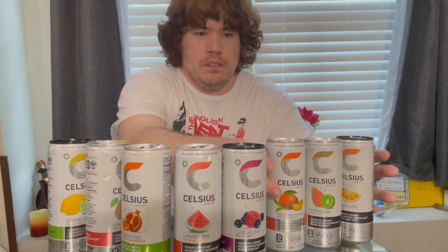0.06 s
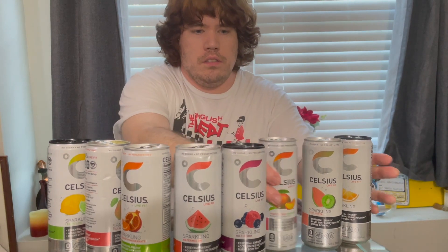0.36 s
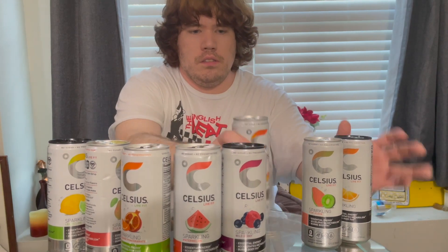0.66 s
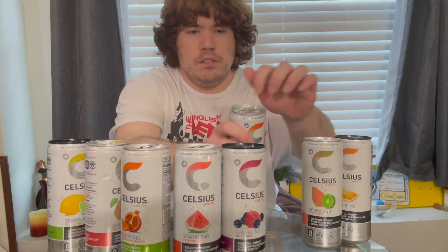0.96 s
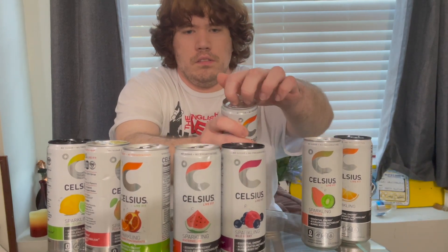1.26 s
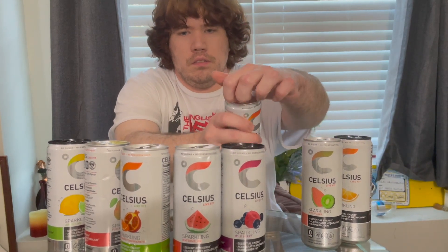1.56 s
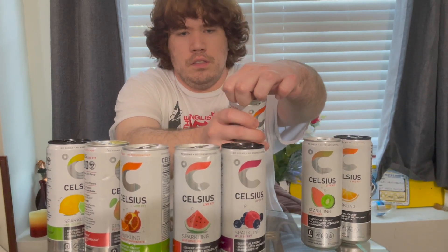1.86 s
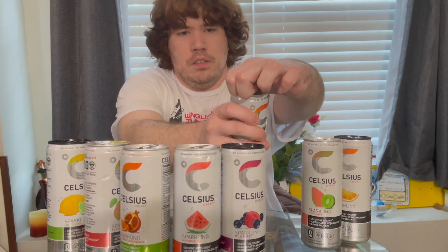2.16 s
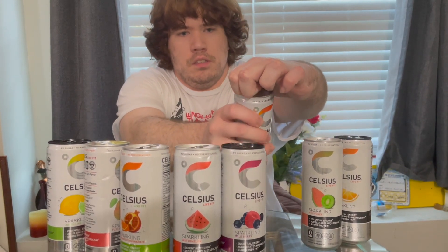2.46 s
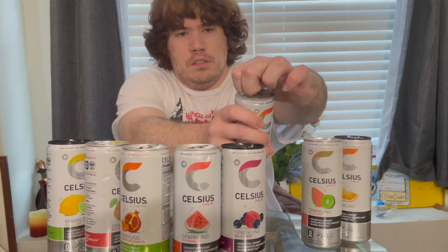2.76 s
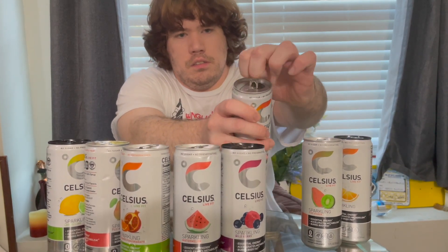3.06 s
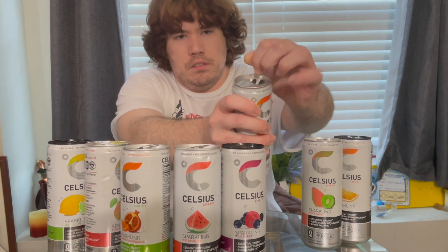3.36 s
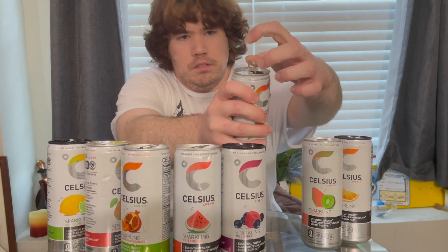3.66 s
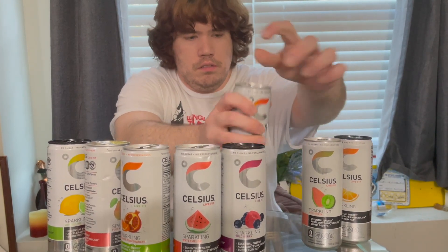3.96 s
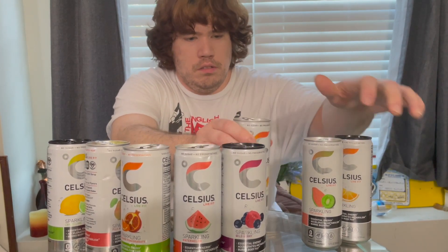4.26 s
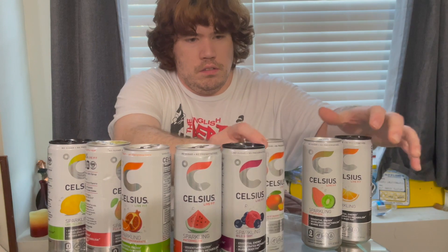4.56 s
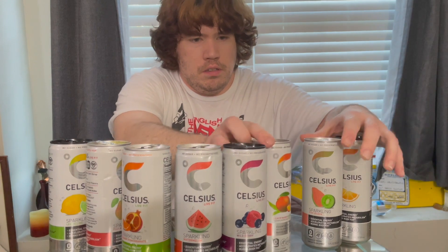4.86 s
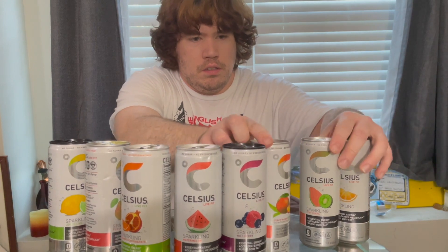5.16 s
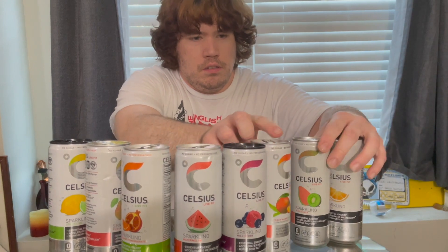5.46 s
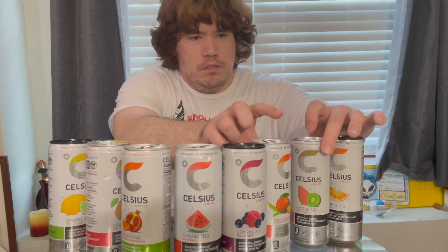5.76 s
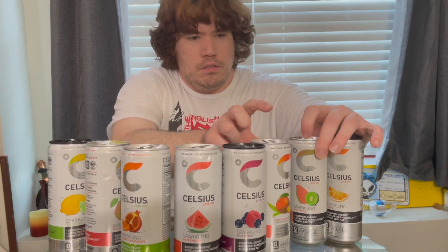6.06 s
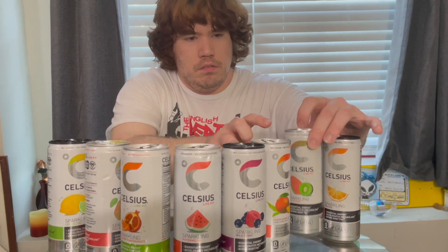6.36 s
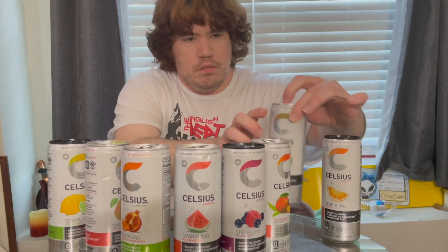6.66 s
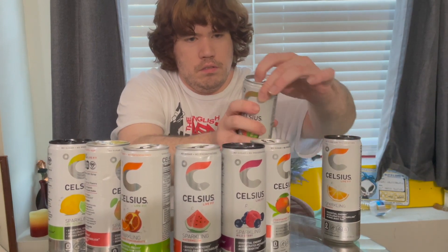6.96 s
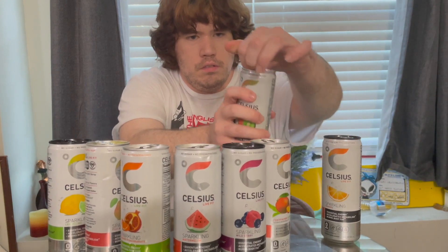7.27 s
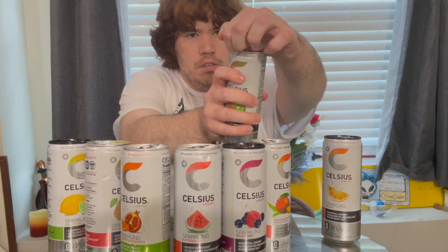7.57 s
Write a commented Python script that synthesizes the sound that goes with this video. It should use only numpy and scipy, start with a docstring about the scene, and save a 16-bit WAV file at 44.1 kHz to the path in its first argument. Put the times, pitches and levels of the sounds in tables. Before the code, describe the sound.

Light clicks on a metal tab lead to a drink can opening: a snap, a quick puff of gas, then a louder, sharp crack. Nails tap the lid and the full can knocks down onto a table. Two cans touch softly, and near the end another seal pops with a brief hiss. Everything is close, with the short echo of a small room and a faint low hum.

```python
"""Full aluminium drink cans are opened at a table in a small room, close to one microphone.
A fingernail picks at the tab, the seal pops, gas hisses out and the lid tears open with a crack.
The can is set down and rings the table; a second one bumps its neighbour, is dragged and is popped.
The walls answer every snap, and a faint appliance hum lies behind it all."""
import sys
import numpy as np
from scipy import signal
from scipy.fft import rfft, irfft, next_fast_len
from scipy.io import wavfile
from scipy.ndimage import map_coordinates

SR = 44100
rng = np.random.default_rng(int(sys.argv[2]) if len(sys.argv) > 2 else 0)


def output_pcm(signal):
    """Save a mono or channel-first signal as 16-bit PCM at the path in sys.argv[1].

    Samples are clipped to [-1, 1] before scaling.
    """
    pcm = np.clip(np.atleast_2d(signal).T, -1, 1) * 32767
    wavfile.write(sys.argv[1], SR, np.round(pcm).astype(np.int16))


N = 344862
T = np.arange(int(.7 * SR)) / SR  # seconds within one event


def snaps():
    """The tab levers the lid open; each jump of the metal also gives the air one low push."""
    # The lid buckles or tears. Each row: start in seconds, strength in dB, rim pitch in Hz,
    # dome pitch in Hz, dome over rim in dB, push over rim in dB.
    jumps = [(2.2985, -14, 4350, 2856, 1, -34.5), (2.3386, -0.5, 4236, 2299, -2, -27.5),
             (2.7412, -5.5, 4350, 1620, -15, -34), (2.7586, 0.5, 4310, 2816, -11, -15),
             (2.761, 7, 4415, 1532, -9, -40), (7.5658, -8.5, 4500, 2367, -46, -34),
             (7.6591, -15, 3410, 2120, -2.5, -19)]
    out = np.zeros(N)
    push_time = T / .00071
    push = (1 - push_time) * np.exp(-push_time)
    for start, db, rim_hz, dome_hz, dome_db, push_db in jumps:
        snap = lid(rim_hz, db, dome_hz, db + dome_db, crack_db=db - 10,
                   dome_ring_db=-36.5, rim_ring_db=-38, bark_s=.0015, flex_t60=.01)
        add(out, start, room(snap, wet_db=-6) + amp(db + push_db) * room(push, wet_db=-14.5))
    return out


def lid(rim_hz, rim_db, dome_hz, dome_db, crack_db, dome_ring_db, rim_ring_db, bark_s, flex_t60):
    """One flick of a lid: the metal cracks, the stiff rim barks, the dome flexes lower, both ring on."""
    # The rim's modes. Each row: pitch in Hz, level in dB, t60 in seconds.
    rim_modes = [(3900, -9, .3), (4100, -5, .33), (4287, 1, .4), (4380, -2, .38), (4534, -5, .32),
                 (4690, -4, .32)]
    # The colour of cracking metal. Each row: frequency in Hz, level in dB.
    crack_colour = [(200, -24), (700, -17), (1100, -7.5), (1600, -4.5), (2800, 9), (3500, 0), (5500, 6.5),
                    (8000, -4.5), (10500, -9), (13000, -9), (16000, -18)]
    bark = tone(rim_hz) * np.exp(-(T / bark_s) ** 2)
    rim = bark + amp(rim_ring_db) * ring(rim_modes, blur=.6, scatter_db=.5)
    dome_ring = resonance(dome_hz, width_hz=300) * fade(700 / dome_hz)  # dies in 700 cycles
    flex = tone(dome_hz) * fade(flex_t60)
    dome = (flex + amp(dome_ring_db) * dome_ring) * (1 - np.exp(-T / .00048))
    crack = noise(crack_colour) * fade(.014)
    return radiate(amp(rim_db) * rim + amp(dome_db) * dome + amp(crack_db) * crack, hz=1190, order=3)


def hiss():
    """Gas jets through the widening slit until the pressure is spent, and sounds the can's hollow."""
    # Gas escapes. Each row: start, time to full flow and length in seconds, full-flow level in dB.
    escapes = [(2.296, .021, .039, -27.5), (7.563, 0.055, 0.087, -25)]
    # The jet's colour. Each row: frequency in Hz, spectral density in dB.
    jet_colour = [(350, -46.5), (600, -30.5), (1500, -24.5), (1950, -16), (3000, -10), (3500, -14.5),
                  (4400, -2), (5200, -10.5), (5700, -7.5), (8700, -9), (10300, -2), (12000, -6.5),
                  (14000, -12.5), (16000, -18)]
    opening_db, drain_db_per_s, closing_t60 = 8.5, 289, .08
    out = np.zeros(N)
    for start, swell, length, db in escapes:
        flow_db = -opening_db * np.maximum(1 - T / swell, 0) - drain_db_per_s * np.maximum(T - swell, 0)
        closing = np.exp(-np.log(1000) * np.maximum(T - length, 0) / closing_t60)
        jet = amp(flow_db) * noise(jet_colour)
        whistle = amp(-8.5 + .5 * flow_db) * resonance(4450, width_hz=380)
        add(out, start, amp(db + wobble(300)) * closing * (jet + whistle))
    return room(out, wet_db=-6)


def ticks():
    """Nails flick a lid that the fingers damp; the grip also shifts faintly at random moments."""
    # A nail picks at the tab or lid. Each row: start in seconds, strength in dB, rim pitch in Hz,
    # dome pitch in Hz, dome over rim in dB, crack over rim in dB.
    picks = [(0.99, -31.5, 4600, 2730, -11, -5.5), (1.172, -47, 4765, 2480, -17, -8),
             (1.287, -45.5, 4270, 1860, -6, -10), (1.3094, -43, 2570, 1870, 2, -2.5),
             (1.375, -52, 4430, 2350, 9, -16), (3.1468, -25, 4150, 2135, 2.5, -12),
             (3.382, -53.5, 4230, 1860, 14, -2), (3.548, -26.5, 2300, 1990, 3, -9),
             (3.7385, -40.5, 4520, 1810, 0.5, -15), (3.8521, -33, 2210, 1370, 1, -27),
             (4.0497, -42, 4150, 1520, -1, -14), (7.055, -44.5, 2103, 1160, 0, -12.5)]
    grip_shifts = [(rng.uniform(0, N / SR), -63.5 + 5 * rng.normal(), 5080, 2988, -6, -1)
                   for _ in range(8)]
    out = np.zeros(N)
    for start, db, rim_hz, dome_hz, dome_db, crack_db in picks + grip_shifts:
        tick = lid(rim_hz, db, dome_hz, db + dome_db, db + crack_db,
                   dome_ring_db=-44, rim_ring_db=-53, bark_s=.00097, flex_t60=.0068)
        add(out, start, room(tick, wet_db=-1.5, direct_db=-1))  # the hand shades the direct sound
    return out


def knocks():
    """A full can lands on one edge and rocks flat; it rings the top and thuds in the table's frame."""
    # The base meets the table. Each row: start in seconds, strength in dB.
    landings = [(0.198, -60), (.285, -66), (4.5216, -13), (4.974, -57), (5.941, -63.5)]
    # Modes of table top and can body. Each row: pitch in Hz, level in dB, t60 in seconds.
    table_modes = [(276.4, 2.5, 0.12), (293, 4.5, 0.19), (364.4, 0.5, .24), (422, -3, .26),
                   (561.2, 7.5, .18), (639.3, -8, 0.25), (676, -11, .5), (752, -8, .34), (884, -2.5, .24),
                   (1375, -7.5, .34), (1486, -6, 0.37), (1816, -9.5, 0.2105), (2088, 1, .27),
                   (2129, 1, .27), (2882, -9, 0.26), (3790, -10, 0.32), (4390, -9.5, .13),
                   (4820, -13, 0.43)]
    top, frame = np.zeros(N), np.zeros(N)
    build = 1 - np.exp(-T / .004)  # the ring builds while the base rocks flat
    for start, db in landings:
        body = build * amp(-7.5) * ring(table_modes, blur=.55, scatter_db=.5)
        add(top, start, amp(db) * (room(body, wet_db=-14) + room(rocking(count=3), wet_db=-2)))
        add(frame, start, build * amp(db - 28.5) * resonance(89, width_hz=12) * fade(.46))
    return radiate(top, hz=254, order=4) + frame


def rocking(count):
    """Contact noise of a base that rocks ever faster and more weakly."""
    # The colour of base on table. Each row: frequency in Hz, spectral density in dB.
    contact_colour = [(100, -33), (200, -25.5), (275, -6), (560, -4.5), (760, -9), (1100, -13.5),
                      (1480, -7), (2100, -14.5), (2600, -16.5), (4700, -16.5), (5300, -29), (10000, -40.5),
                      (16000, -56.5)]
    first_gap_s, gap_ratio, loss_db = .0053, .85, 2
    out = np.zeros(N)
    press = 1 - np.exp(-(T / .0004) ** 2)  # the contact force takes a moment to build
    for k in range(count):
        start = first_gap_s * np.sum(gap_ratio ** np.arange(k))
        contact = press * noise(contact_colour) * fade(.051)
        add(out, start, amp(.5 - loss_db * k) * contact)
    return out[:len(T)]


def clink():
    """Two full cans touch: a short dry bump, and their walls ring faintly."""
    # The colour of can against can. Each row: frequency in Hz, spectral density in dB.
    bump_colour = [(88, -31), (150, -1), (1340, -2), (3420, -17), (3770, -5), (4320, -18), (5460, -11),
                   (9260, -18), (12200, -37), (16000, -39)]
    # Modes of a standing full can. Each row: pitch in Hz, level in dB, t60 in seconds.
    can_modes = [(458, -6, 0.47), (1238, -9, 0.13), (1873, -13, 0.37), (1997, -14, 0.23), (2805, 0, 0.092),
                 (3822, -19, 0.34)]
    out = np.zeros(N)
    bump = amp(-31.5) * noise(bump_colour) * fade(.009)
    can_ring = amp(-52.5) * ring(can_modes, blur=.3, scatter_db=1.2)
    add(out, 5.9966, room(bump + can_ring, wet_db=-7))
    return out


def rubs():
    """A sleeve rubs the table with a faint low murmur; later a dragged can scrapes softly."""
    # The sleeve, then the can twice. Each row: start and length in seconds, resonance in Hz, level in dB.
    strokes = [(.35, 0.26, 169, -65), (6.12, 0.28, 464, -72.5), (6.545, .18, 446, -66.5)]
    out = np.zeros(N)
    for start, length, hz, db in strokes:
        swell = np.sin(np.pi * np.minimum(T / length, 1))
        add(out, start, amp(db) * swell * resonance(hz, width_hz=.033 * hz))
    return out


def room(x, wet_db, direct_db=0):
    """At the microphone: direct sound, the nearest wall's echo and a tail whose treble dies first."""
    # The room's decay. Each row: frequency in Hz, t60 in seconds.
    wall_decay = [(150, 0.68), (500, .68), (1500, .42), (4300, 0.37), (8000, 0.33), (11500, 0.3),
                  (13500, 0.11), (16000, 0.11)]
    hz, t, spectrum = signal.stft(rng.standard_normal(len(T)), SR, nperseg=256)
    decay = amp(-60 * t / along(wall_decay, hz)[:, None])
    tail = signal.istft(spectrum * decay, SR, nperseg=256)[1][:len(T)]
    tail *= np.where(T > .0056, 1 + 2.2 * fade(.21), .7)  # a weak lead-in, then strong early echoes
    tail /= np.linalg.norm(tail)
    tail[round(.0082 * SR)] += amp(-13)  # the nearest wall
    return amp(direct_db) * x + amp(wet_db) * signal.fftconvolve(x, tail)[:len(x)]


def background():
    """Room air, rumble and a low appliance hum, swelling at the end with the gas puff's low thump."""
    # The low tone; its last point is the thump. Each row: time in seconds, pitch in Hz, level in dB.
    low_tone = [(1.3, 53.79, -52.5), (3.1, 56.42, -55), (5.7, 56.96, -57), (6.5, 55.45, -49.5),
                (7.2, 54.4, -53.5), (7.8, 54.1, -46)]
    # The colours of room air and of rumble. Each row: frequency in Hz, spectral density in dB.
    air_colour = [(88, -42.5), (150, -10), (175, 1), (217, -8.5), (368, -3), (414, -10), (494, -13),
                  (612, -19), (745, -15.5), (837, -22.5), (1420, -16), (2310, -23), (4580, -18.5),
                  (5460, -27), (16000, -36)]
    rumble_colour = [(15, 5.5), (30, -1.5), (45, -13.5), (80, -17.5), (130, -18.5), (200, -26.5),
                     (400, -53.5)]
    start_s, rise_s, idle_db, waver_db = 1.1, .24, -15, 1.1  # the hum comes up from a faint idle
    t = np.arange(N) / SR
    times, hz, db = np.transpose(low_tone)
    phase = 2 * np.pi * np.cumsum(np.interp(t, times, hz)) / SR
    idle = np.clip(1 - (t - start_s) / rise_s, 0, 1)
    level_db = np.interp(t, times, db) + idle_db * idle + waver_db * wobble(6.4, N)
    hum = amp(level_db) * np.sin(phase + .25 * wobble(6.5, N))
    mains = amp(-67) * np.sin(2 * np.pi * 119.5 * t + .36 * wobble(12, N))
    return hum + mains + amp(-70) * noise(air_colour, N) + amp(-55.5) * noise(rumble_colour, N)


def ring(modes, blur, scatter_db):
    """Modes struck at new strengths; liquid and fingers blur their pitch."""
    return sum(amp(db + scatter_db * rng.normal()) * fade(t60)
               * np.sin(2 * np.pi * hz * T + blur * wobble(55)) for hz, db, t60 in modes)


def radiate(x, hz, order):
    """A body too small to move much air loses its bass."""
    return signal.sosfilt(signal.butter(order, hz, "high", fs=SR, output="sos"), x)


def noise(colour, size=len(T)):
    """Noise of rms 1 with the given (Hz, dB) colour."""
    m = next_fast_len(size)
    gain = amp(along(colour, np.fft.rfftfreq(m, 1 / SR)))
    return unit(irfft(rfft(rng.standard_normal(m)) * gain, m)[:size])


def resonance(hz, width_hz):
    """Noise of rms 1 in one resonance."""
    m = next_fast_len(len(T))
    detuning = (np.fft.rfftfreq(m, 1 / SR) - hz) / width_hz
    return unit(irfft(rfft(rng.standard_normal(m)) / (1 + detuning ** 2), m)[:len(T)])


def wobble(rate, size=len(T)):
    """A smooth random curve, rate knots a second."""
    knots = rng.standard_normal(int(size * rate / SR) + 4)
    return map_coordinates(knots, [np.arange(size) * rate / SR])


def tone(hz):
    """A sine that starts at zero."""
    return np.sin(2 * np.pi * hz * T)


def fade(t60):
    """Exponential decay, 60 dB down after t60 seconds."""
    return np.exp(-np.log(1000) * T / t60)


def along(points, hz):
    """Interpolate (Hz, value) points on a log frequency axis."""
    frequencies, values = np.transpose(points)
    return np.interp(np.log(hz + 1), np.log(frequencies + 1), values)


def amp(db):
    """Decibels to gain."""
    return 10 ** (np.asarray(db) / 20)


def unit(x):
    """Scale to rms 1."""
    return x / np.sqrt(np.mean(x ** 2) + 1e-20)


def add(track, start, x):
    """Mix x into the track at start seconds."""
    i = round(start * SR)
    track[i:i + len(x)] += x[:N - i]


def scene():
    """Cans, table and room at one microphone."""
    return (snaps() + ticks() + knocks() + clink() + hiss() + rubs() + background())[None]


def record(dry):
    """The loudest snaps overload the microphone input; the treble ends steeply at 16 kHz."""
    clipped = dry / (1 + np.abs(dry) ** 6) ** (1 / 6)
    m = next_fast_len(N + SR // 2)
    lowpass = 1 / (1 + (np.fft.rfftfreq(m, 1 / SR) / 16000) ** 120)
    return irfft(rfft(clipped, m) * lowpass, m)[..., :N]


dry = scene()
out = record(dry)
output_pcm(out)
```